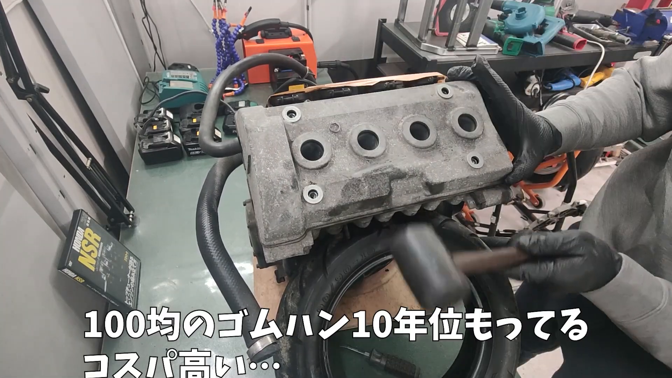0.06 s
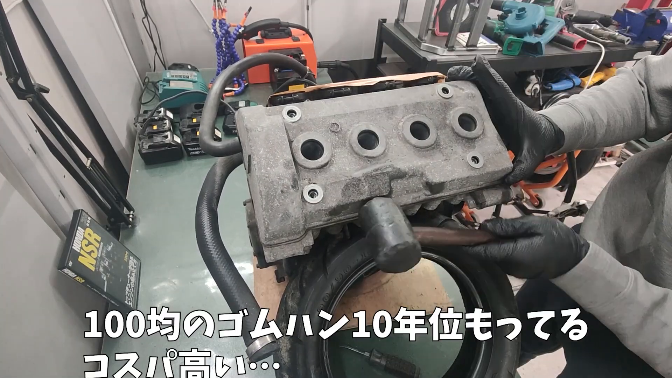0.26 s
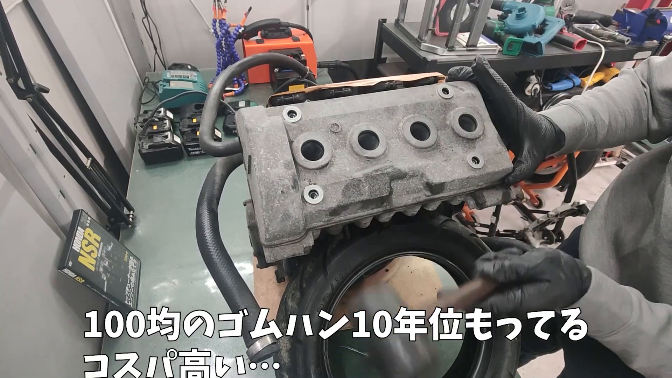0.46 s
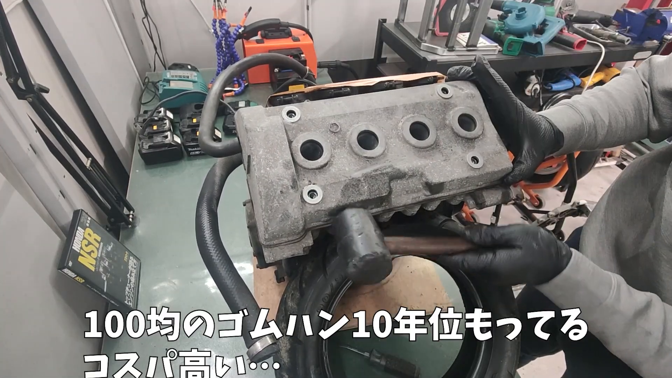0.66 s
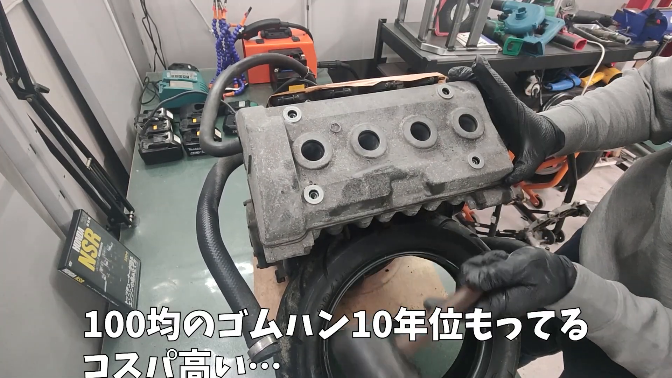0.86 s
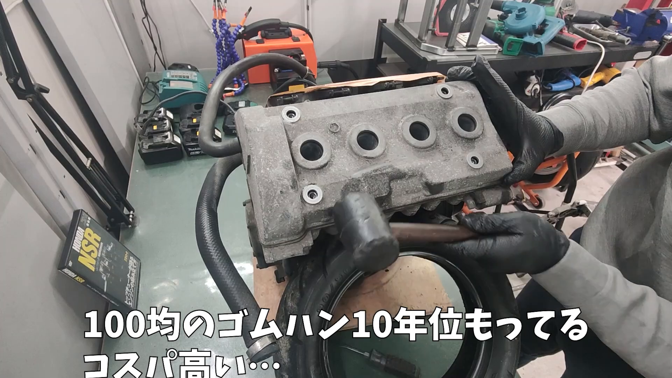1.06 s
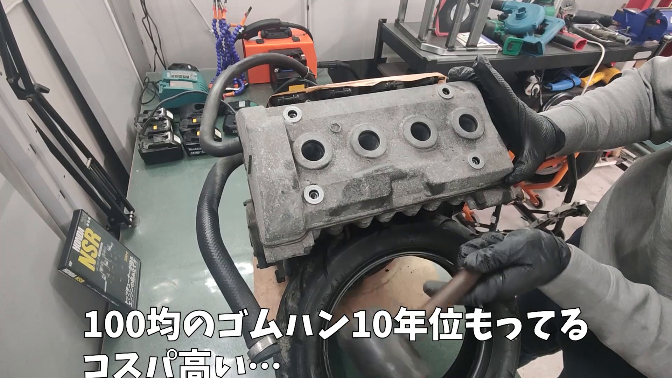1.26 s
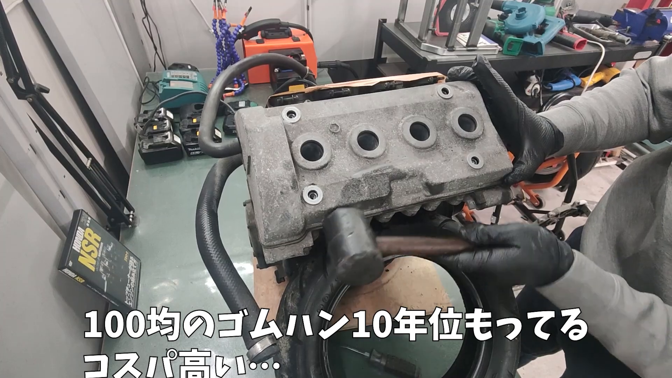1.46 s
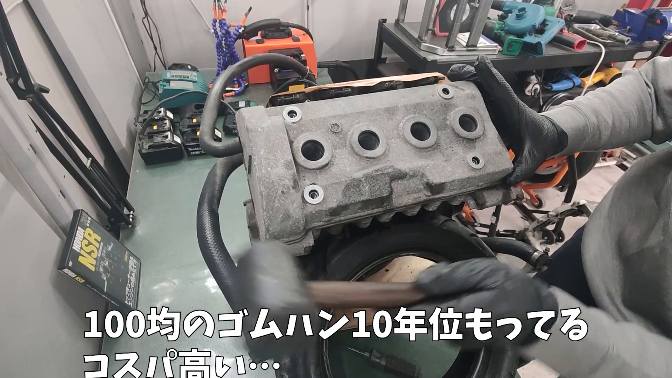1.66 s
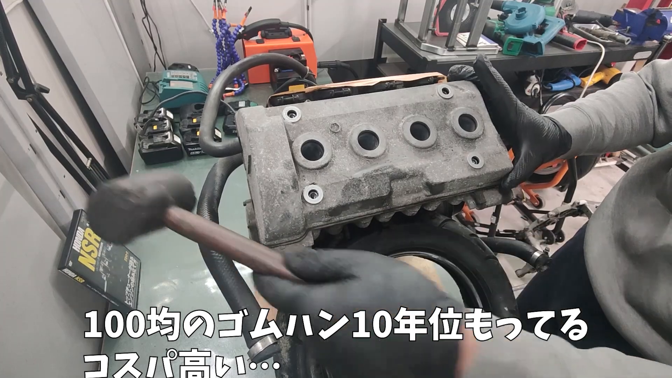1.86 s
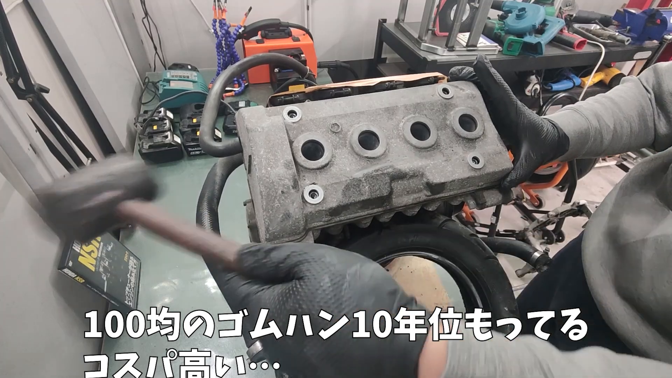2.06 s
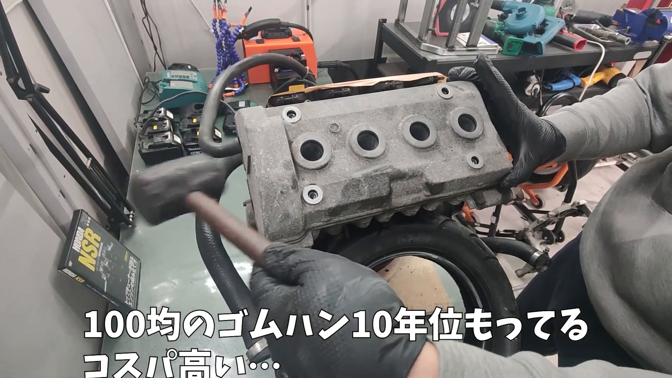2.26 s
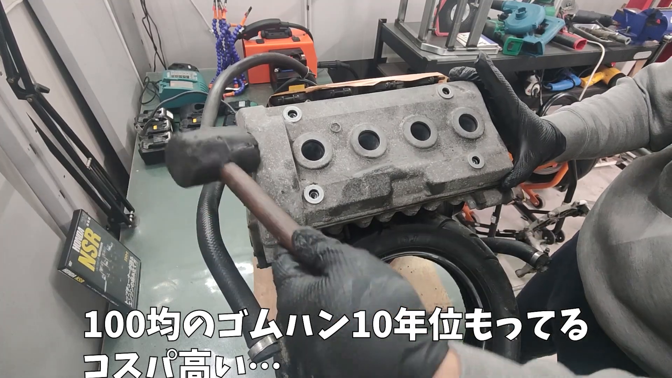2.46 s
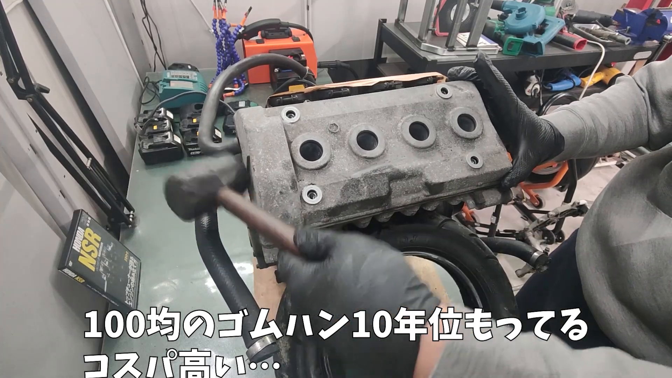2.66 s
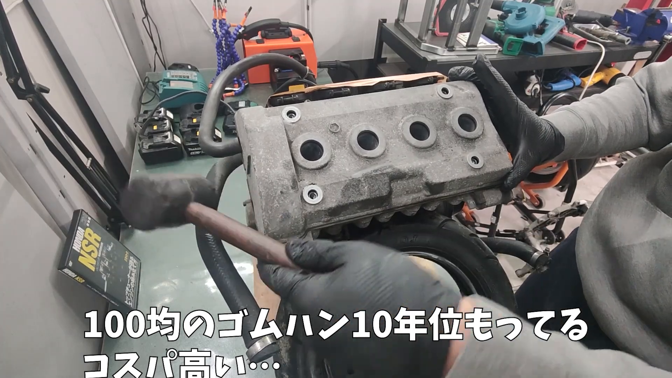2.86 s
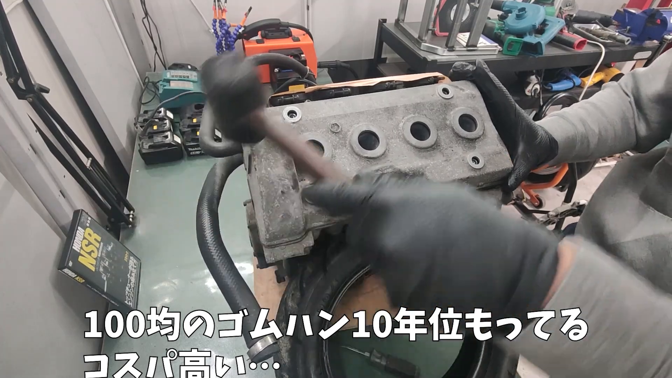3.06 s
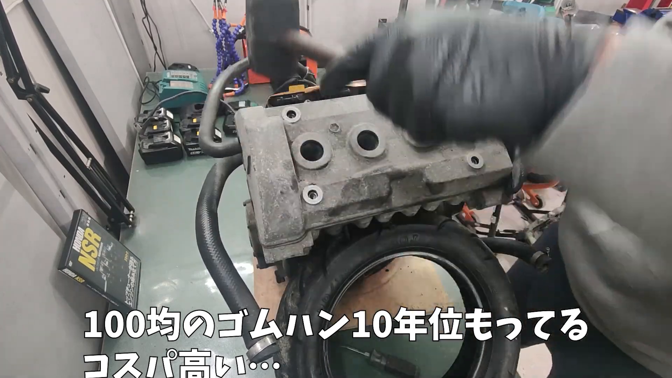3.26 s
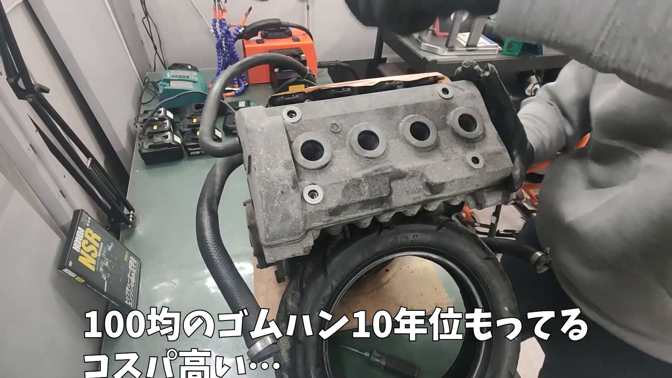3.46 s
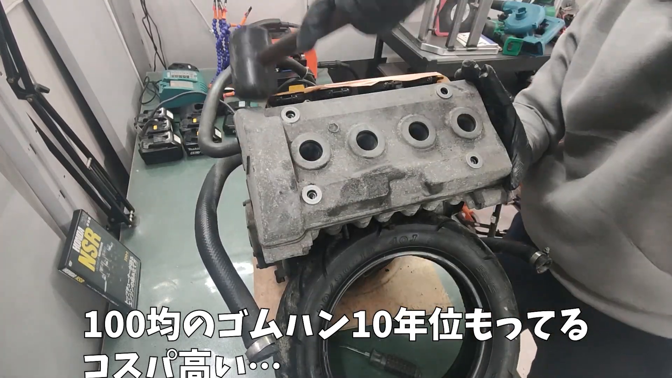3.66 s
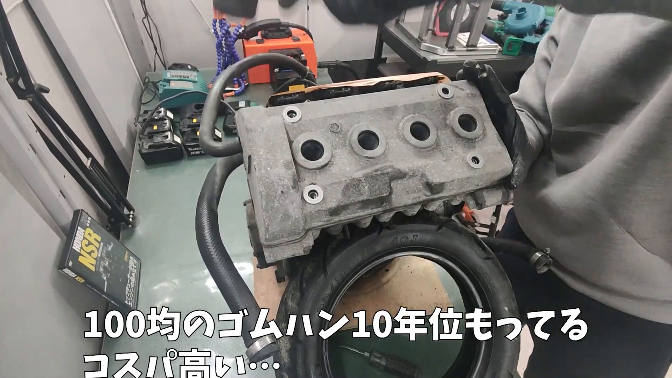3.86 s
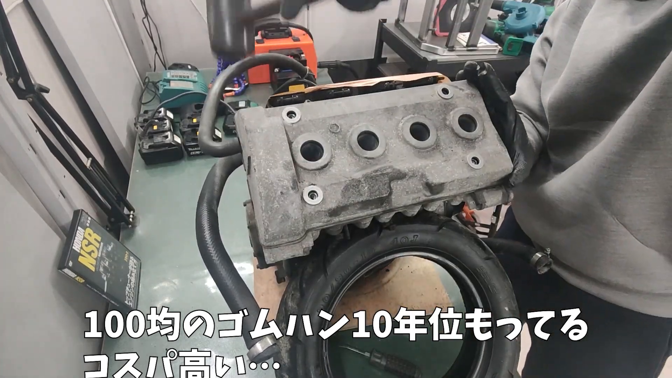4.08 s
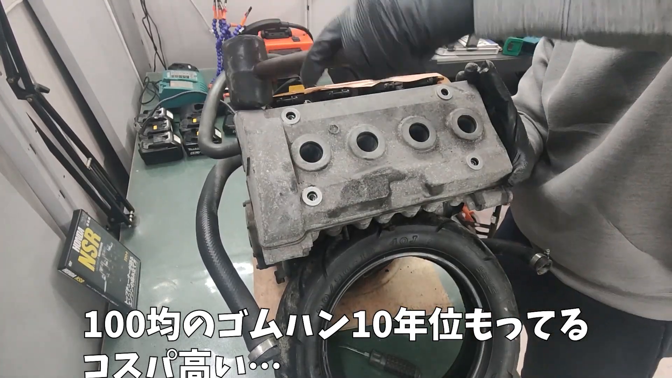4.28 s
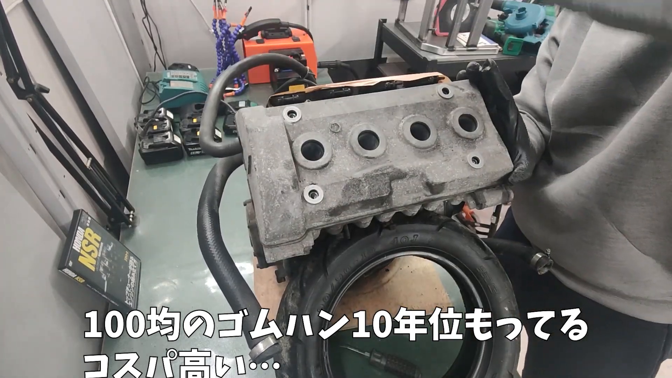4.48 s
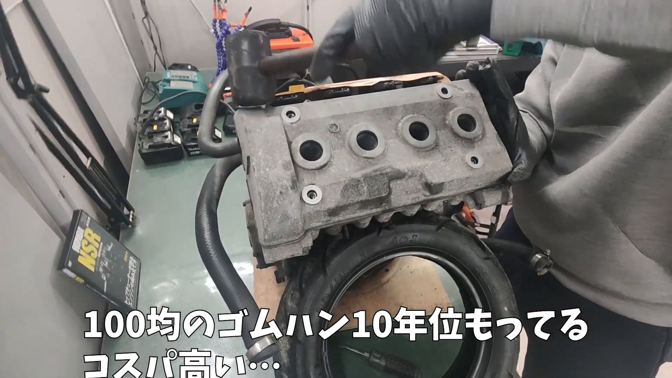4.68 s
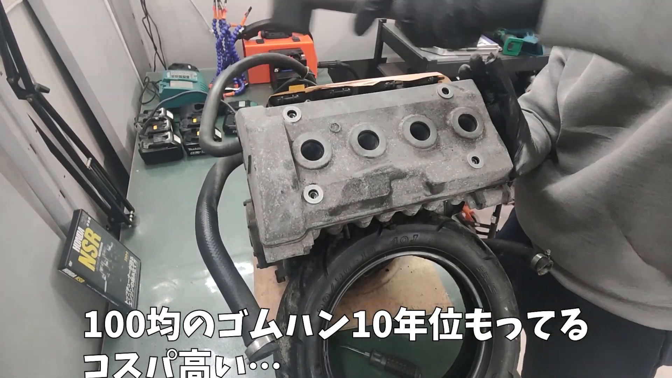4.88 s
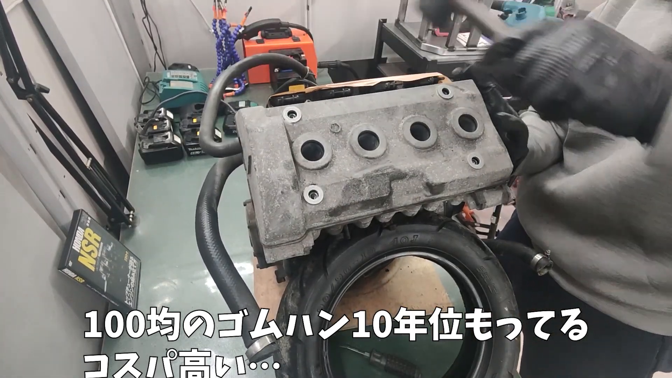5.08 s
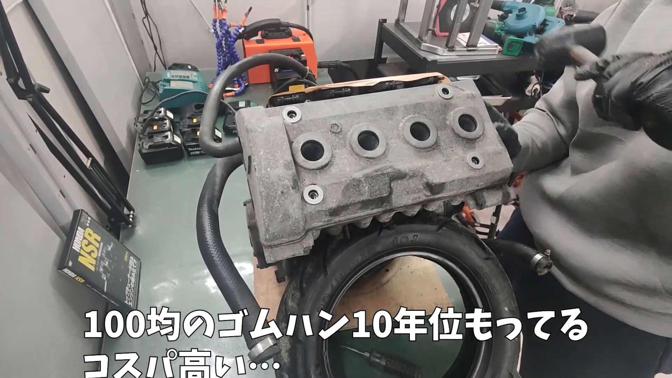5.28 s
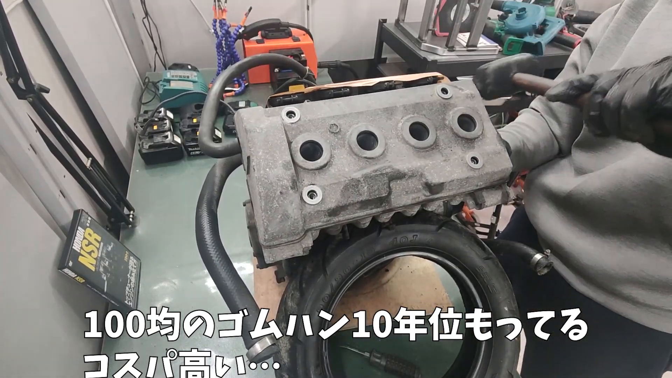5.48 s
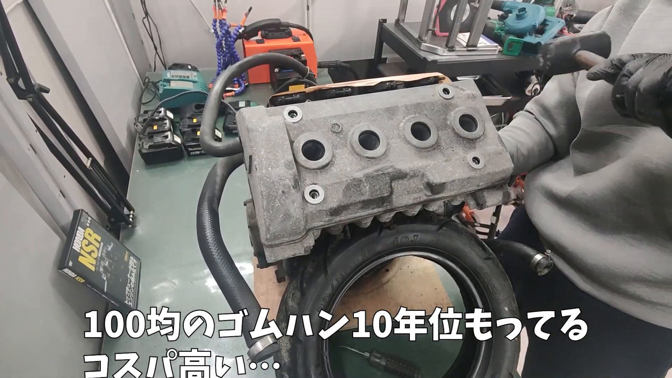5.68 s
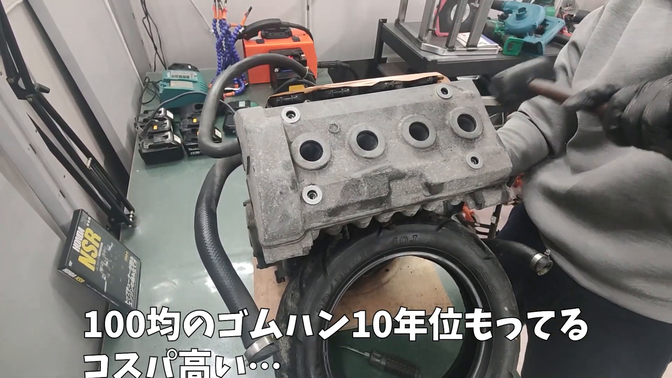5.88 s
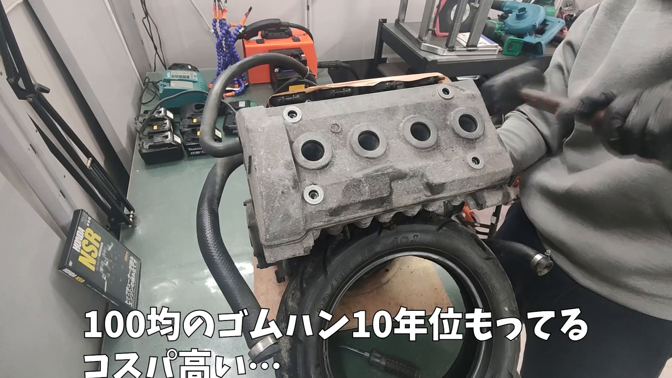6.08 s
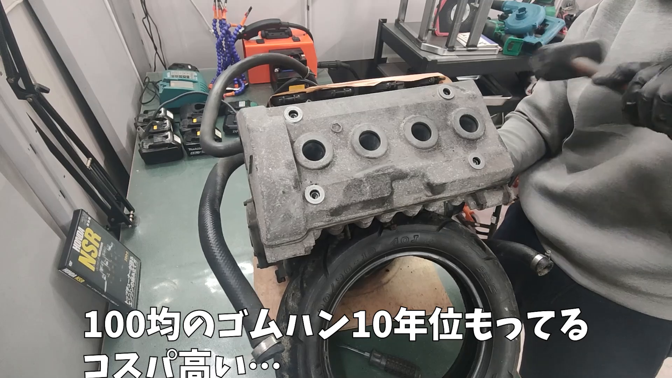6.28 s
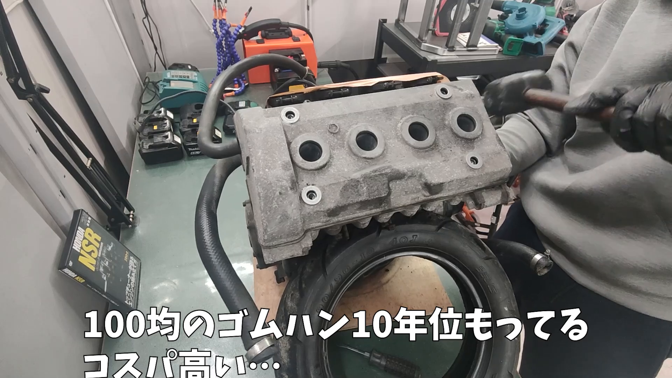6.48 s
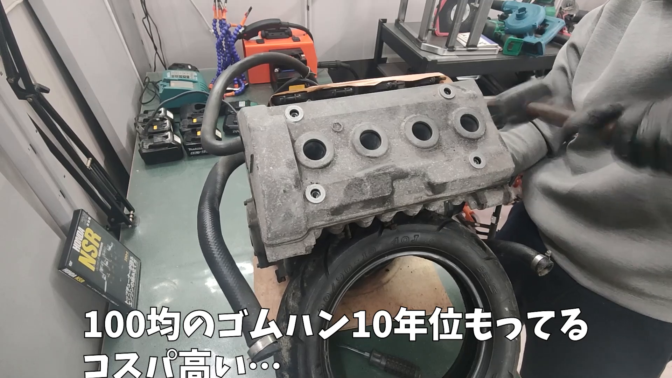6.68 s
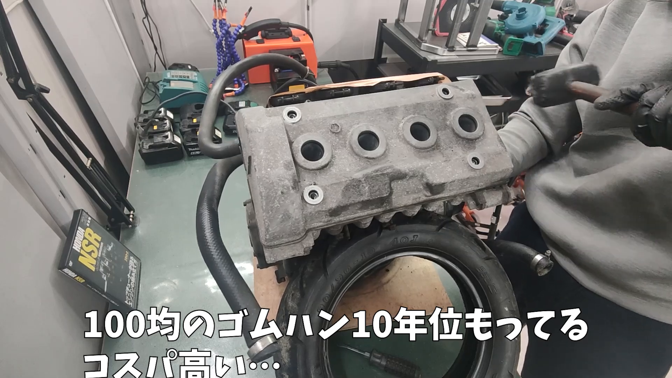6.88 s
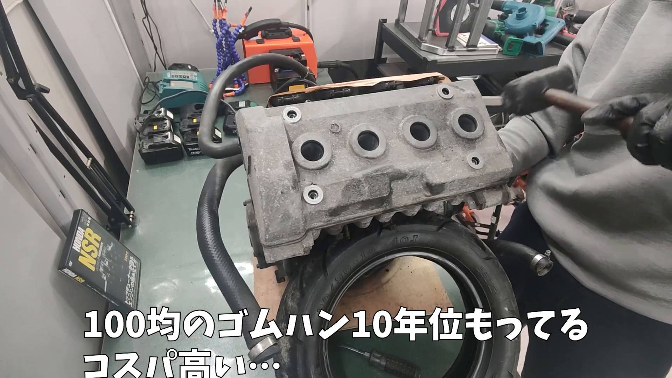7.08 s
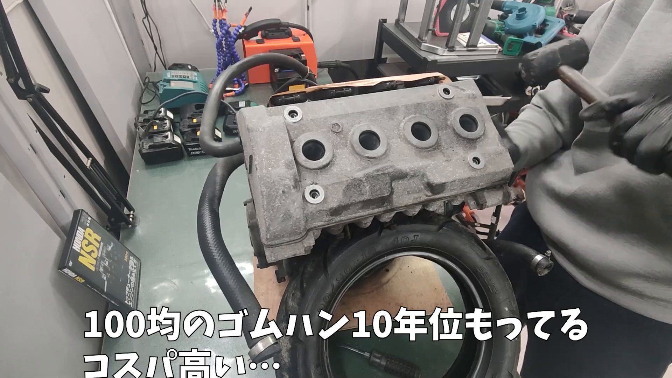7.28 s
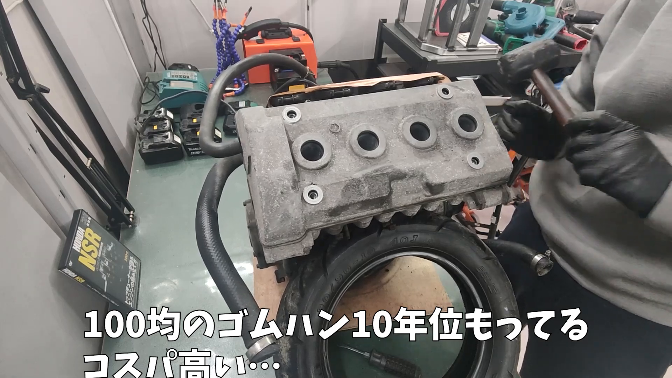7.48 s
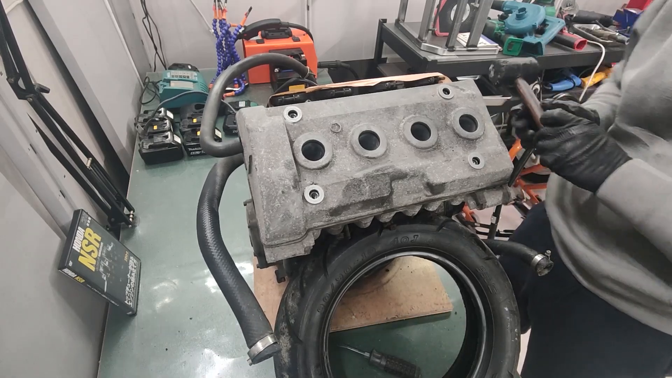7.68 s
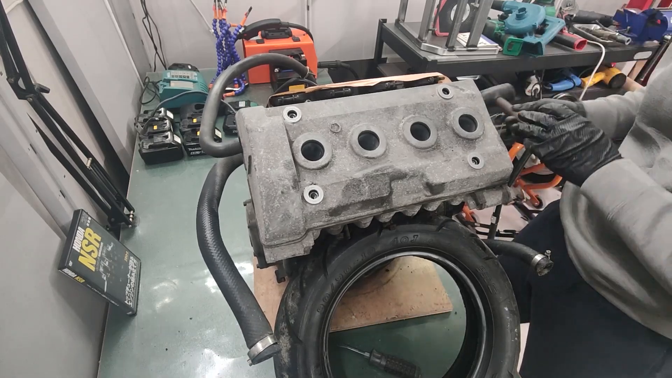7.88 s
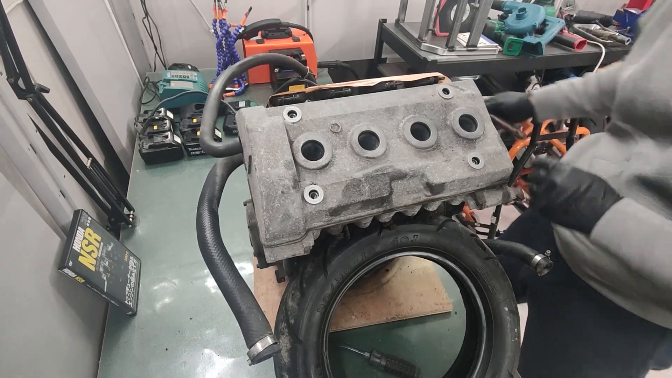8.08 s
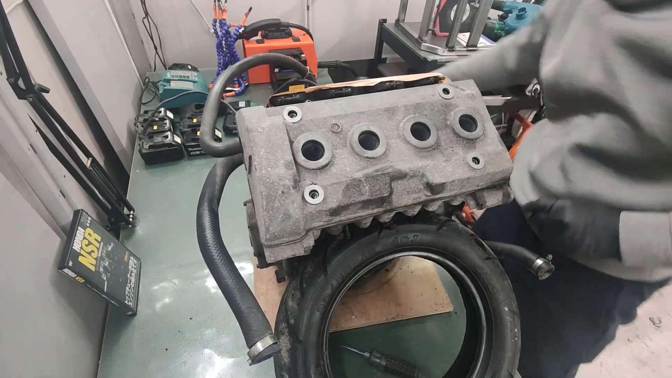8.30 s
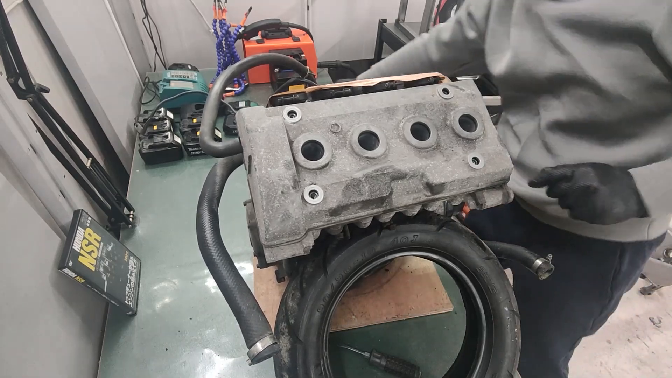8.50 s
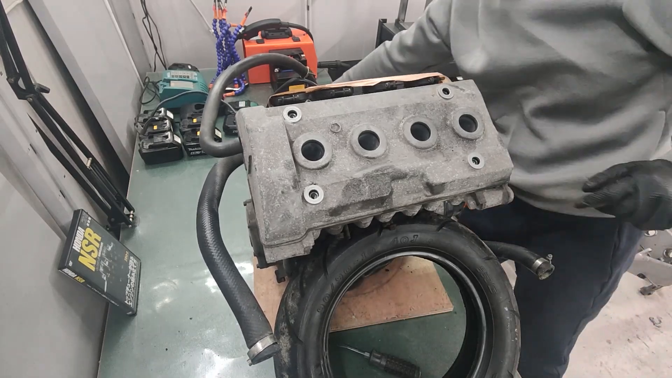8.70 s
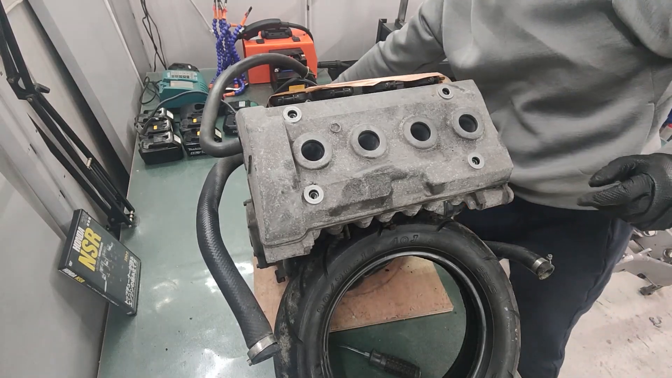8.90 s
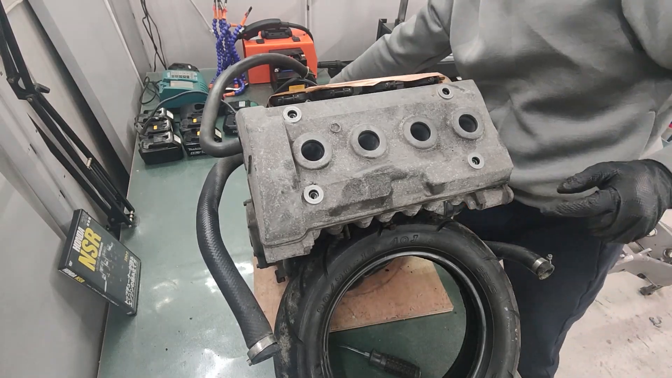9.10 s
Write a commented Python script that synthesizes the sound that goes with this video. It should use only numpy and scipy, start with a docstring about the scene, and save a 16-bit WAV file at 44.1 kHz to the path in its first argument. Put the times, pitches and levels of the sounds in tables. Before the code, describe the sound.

Dull, hollow mallet blows on an aluminium engine cover ring briefly in a small workshop, ending with soft cloth rustle and a late low thud.

```python
"""First heard is a mallet blow already ringing: a rubber mallet taps round a cast aluminium engine cover.
The place is a small hard-walled workshop; each blow is a filtered knock that rings damped modes and the room.
A limiter squashes each blow and lets the room swell up behind it, in uneven runs from edge to edge.
Shaped noise makes sleeves, gloves and body movement; low-passed pulses make dull thuds, the last with a
bright noise at its attack. Shaped noise for still air and a few sines for a low hum lie under it all."""
import sys
import numpy as np
from scipy import signal
from scipy.fft import rfft, irfft
from scipy.io import wavfile
from scipy.ndimage import uniform_filter1d, minimum_filter1d

SR = 44100
rng = np.random.default_rng(int(sys.argv[2]) if len(sys.argv) > 2 else 0)


def waveform_to_disk(signal):
    """Save audio, clipped to [-1, 1], as 16-bit WAV at the path in sys.argv[1]."""
    frames = np.transpose(np.atleast_2d(signal))
    scaled = np.clip(frames, -1, 1) * 32767
    samples = np.round(scaled).astype(np.int16)
    wavfile.write(sys.argv[1], SR, samples)


N = 403293

LEAD = SR // 4  # samples kept ahead of time zero, for a blow that lands before it
TIME = np.arange(N) / SR
RING_TIME = np.arange(SR) / SR

# Mallet blows; a soft, glancing one has a lower contact_hz, the rattle is of the cover on its seat,
# and the struck spot has a hollow note: start_s, edge, relative_force_db, contact_hz, rattle_db, spot_hz
BLOWS = [(-0.05, "left", -2, 348, 0, 740), (0.3298, "near", -2, 804, -13.5, 3670),
         (0.71, "near", 2, 700, -2, 820), (1.0937, "near", 3.5, 667, 5, 1750),
         (1.4672, "near", 4, 684, 8, 860), (2.224, "left", -6.5, 710, -3, 475),
         (2.5012, "left", -7.5, 606, 0.5, 500), (2.7589, "left", -3.5, 330, 4, 124),
         (3.6583, "far", -2, 730, -12, 775), (4.009, "far", 0.5, 730, -0.5, 820),
         (4.044, "far", -9, 520, 3, 830), (4.3527, "far", 1, 785, 4.5, 2020),
         (4.6961, "far", 4.5, 646, 14.5, 2200), (5.5035, "corner", -8.5, 324, 2.5, 1600),
         (5.8572, "corner", -6, 690, 3.5, 574), (6.1897, "right", -6, 700, -2, 406),
         (6.4878, "right", -3, 654, 1, 4850), (6.791, "right", -4.5, 860, -3.5, 1430),
         (7.122, "right", -8.5, 606, -3.5, 640)]
# Knock of rubber on the casting, spectrum shape: pitch_hz, relative_level_db
KNOCK_SPECTRUM = [(45, -43), (100, -16.5), (200, -7.5), (350, -3), (550, 2), (900, -1), (1300, 0.5),
                  (1750, -5), (2400, -9.5), (4000, -17), (6500, -25), (9000, -38), (11500, -37.5),
                  (15000, -48)]
# Modes of the cover, damped by its gasket, before each blow's variation: pitch_hz, level_over_knock_db, t60_s
COVER_MODES = [(214, -6, 0.19), (383.5, -1.5, 0.066), (528, -3, 0.029), (683, 1, 0.014), (913, -2, 0.084),
               (1155, 0.5, 0.071), (1220, -11.5, 0.089), (1578, -4.5, 0.09), (1800, -7, 0.011),
               (2200, -9, 0.024)]
# Modes of a steel fitting, before nearness to it is counted: pitch_hz, relative_level_db, t60_s
STEEL_MODES = [(3307, 7, .25), (3682, 8, .25), (4795, 2, .15), (6575, 10, .15), (7385, 17, .22),
               (7425, 15, .14), (12950, 13, .13)]
# How each edge colours the knock, by edge name: pitch_hz, level_db
EDGE_COLOURS = {"near": [(110, -2.5), (270, -9), (530, -9), (1150, -0.5), (1750, -3.5), (2300, -9.5),
                (4300, -9), (14000, -2.5)], "left": [(110, 0), (270, -7), (500, -2.5), (750, 0),
                (1150, -0.5), (2150, -4.5), (4300, -6), (14000, 4)], "far": [(110, -2.5), (270, -10),
                (530, -8.5), (1150, 0), (2150, -4), (4300, -9.5), (14000, 6)], "corner": [(110, -2),
                (270, -5), (530, -5.5), (1150, 3), (2150, -7.5), (3300, -0.5), (5000, -5.5), (14000, 11.5)],
                "right": [(110, -3), (270, 5.5), (530, -2.5), (1150, 0), (2150, -0.5), (4300, 6),
                (14000, 20.5)]}
# Where the mallet works across the stereo image: time_s, left_minus_right_db
PLACES = [(.5, 0), (2.5, 1.5), (4.7, -1.5), (6.1, -2.5), (7.1, -0.8)]
# Reverberation: pitch_hz, level_against_direct_db, t60_s
ROOM_TAIL = [(61.5, 20.5, 0.48), (182, 3, 0.38), (300, 0.5, 0.46), (544, -4, 0.56), (1220, -4, 0.58),
             (4000, -1, 0.63), (8000, -4, 0.49), (13900, -4, 0.21)]
# Standing waves between the walls: pitch_hz, level_over_direct_db, t60_s
STANDING_WAVES = [(72.7, 30.5, 0.59), (128.9, 22.5, 0.72)]
# First reflections, off the floor and the wall: delay_s, left_db, right_db
FIRST_BOUNCES = [(.0071, -5.5, -18.5), (.0096, -8.5, -11)]
# Dull thuds close by: start_s, level_db, contact_hz
THUD_TIMES = [(6.857, -27.5, 300), (8.8086, -26, 150), (8.8237, -14.5, 453)]
# Dull body of the thuds, spectrum shape: pitch_hz, relative_level_db
THUD_SPECTRUM = [(25, -46), (50, -18.5), (90, -36), (190, 0.5), (350, 4), (600, -2), (1000, -10.5),
                 (1700, -29), (5000, -27), (15000, -37)]
# Sleeve strokes, and last the bright noise at the attack of the late thud:
# middle_s, half_length_s, level_db, centre_hz
SOFT_STROKES = [(3.359, 0.034, -61.5, 3400), (7.784, 0.035, -62.5, 5170), (7.895, 0.036, -57.5, 6240),
                (8.011, 0.045, -60, 2980), (8.324, 0.072, -57.5, 2290), (8.6, 0.87, -70, 8000),
                (8.864, 0.04, -57, 4800)]
# Gloves scuff the handle and the cover: start_s, level_db, centre_hz, fade_s
GLOVE_SCUFFS = [(3.3, -58.5, 1650, 0.081), (3.49, -68, 2690, 0.29), (5.18, -52, 1020, 0.022),
                (5.293, -53.5, 1300, 0.013), (7.499, -62.5, 4000, 0.054), (7.677, -64.5, 1150, .05),
                (7.98, -57, 1170, 0.083), (8.255, -53, 1250, .12), (8.483, -49.5, 1620, 0.073)]
# Tones of one glove that squeaks as it slides: pitch_hz, level_db
SQUEAK_TONES = [(1850, -61), (2640, -57)]
# The worker leans over, straightens up and steps back: start_s, end_s, rumble_db, cloth_db
BODY_MOVES = [(3.152, 3.6, -72.5, -87), (3.66, 5.954, -57.5, -57.5), (5.95, 7.423, -62, -71),
              (7.7, 9.3, -55, -66), (8.165, 8.596, -75, -66), (8.67, 8.773, -52.5, -90)]
# Still air, spectrum shape: pitch_hz, relative_level_db (per Hz)
AIR_SPECTRUM = [(20, -22), (40, -1), (65, -1), (110, -5.5), (250, -10), (600, -16), (1300, -21),
                (2500, -34), (7000, -45.5), (11000, -43), (15000, -50.5)]
# Low hum: pitch_hz, level_db (rms)
HUM_TONES = [(64.6, -77), (129, -74.5), (312, -76), (371, -87)]
# Colour of the microphone port: pitch_hz, level_db
PORT_COLOUR = [(8500, -0.5), (11500, -8), (13500, -2), (15300, 1.5), (17000, 9.5)]

CONTACT_HZ = 700  # a square blow, which gives the plain knock
RATTLE_HZ = 5500  # half the rattle is reached here, more above
SPOT_DB, SPOT_OCTAVES = 3.5, 0.16  # height and half width of the spot's note
# the mallet passes the steel fitting: when, how loudly it rings there, how fast that falls before and after
FITTING_S, FITTING_DB, FITTING_FALL_DB_PER_S = 6.79, 0.5, 27.5
SCUFF_SPREAD, SQUEAK_SPREAD = 1.63, 1.04  # band edge over centre
SQUEAK_S, SQUEAK_FADE_S = 8.262, 0.079
MOVE_RAMP_S = 0.029  # each movement starts and stops this gently
AIR_DB = -62.5  # rms
TOP_HZ = 16000  # upper limit of the recorded band


def mallet(blow_db=3):
    """Each blow pushes the cover and rings its modes; each edge reaches the room by its own paths."""
    out = np.zeros((2, LEAD + N))
    rooms = {edge: workshop() for edge in EDGE_COLOURS}
    knock = pulse(KNOCK_SPECTRUM)
    knock = knock / np.abs(knock).max()
    steel = ring(STEEL_MODES)
    for s, edge, force_db, contact_hz, rattle_db, spot_hz in BLOWS:
        colour = pulse(blow_colour(edge, contact_hz, rattle_db, spot_hz))
        push = signal.fftconvolve(knock, colour)[:len(knock)]
        # every blow lands a little differently: modes shift in pitch (ratio) and level (dB)
        chance = rng.standard_normal((len(COVER_MODES), 2))
        pitch_ratio = 1 + chance[:, :1] * [.012, 0, 0]
        level_shift = chance[:, 1:] * [0, 2.5, 0]
        cover = ring(np.array(COVER_MODES) * pitch_ratio + level_shift)
        steel_db = FITTING_DB - FITTING_FALL_DB_PER_S * abs(s - FITTING_S)
        metal = signal.unit_impulse(SR) + cover + undb(steel_db) * steel
        blow = spread_out(signal.fftconvolve(push, metal)[:SR // 2])
        side_db = np.interp(s, *np.transpose(PLACES)) * np.array([[.5], [-.5]])
        in_room = signal.fftconvolve(blow[None], rooms[edge], axes=1)
        add(out, undb(force_db + blow_db + side_db) * in_room, s)
    return out[:, LEAD:]


def blow_colour(edge, contact_hz, rattle_db, spot_hz):
    """A longer contact rolls the knock off sooner, a jumping cover adds treble, the spot adds its note."""
    hz = np.geomspace(50, 16000, num=80)
    edge_hz, edge_db = np.transpose(EDGE_COLOURS[edge])
    edge_colour = np.interp(np.log(hz), np.log(edge_hz), edge_db)
    contact = 20 * np.log10((1 + (hz / CONTACT_HZ) ** 2) / (1 + (hz / contact_hz) ** 2))
    rattle = rattle_db * hz ** 2 / (hz ** 2 + RATTLE_HZ ** 2)
    spot = SPOT_DB * np.exp(-.5 * (np.log2(hz / spot_hz) / SPOT_OCTAVES) ** 2)
    return np.column_stack([hz, edge_colour + contact + rattle + spot])


def spread_out(x, bend_hz=900, width_hz=420, count=16):
    """All-passes smear a blow in time without colouring it: the body lags, the treble chatters at random."""
    chance = rng.random((count, 2))
    chatter_hz = 2300 + 13500 * chance[:, 0] ** 2
    chatter_width = width_hz * (.3 + 1.5 * chance[:, 1])
    for hz, width in [(bend_hz, bend_hz), *zip(chatter_hz, chatter_width)]:
        _, poles = signal.iirpeak(hz, hz / width, fs=SR)
        x = signal.lfilter(poles[::-1], poles, x)
    return x


def workshop(near_db=-4, near_s=0.0063, build_s=0.001):
    """Direct sound, scatter off the engine and bench, then the tail of the room and its standing waves."""
    noise, tail = rfft(diffuse(SR)), 0
    hz = np.maximum(np.fft.rfftfreq(SR, 1 / SR), 1)
    half_octave = np.round(2 * np.log2(np.maximum(hz, ROOM_TAIL[0][0])))
    gain, t60 = undb(along(ROOM_TAIL, SR)), along(ROOM_TAIL, SR, column=2)
    # each half octave decays at its own rate
    for k in np.unique(half_octave):
        inside = half_octave == k
        damping = np.log(1000) / t60[inside].mean()
        tail = tail + irfft(noise * gain * inside) * np.exp(-damping * RING_TIME) * np.sqrt(2 * damping / SR)
    response = tail * (1 - np.exp(-RING_TIME / build_s)) + ring(STANDING_WAVES)
    scatter = diffuse(SR, apart_hz=500) * np.exp(-RING_TIME / near_s) * np.sqrt(2 / near_s / SR)
    response += undb(near_db) * scatter
    response[:, 0] += 1  # direct sound
    for s, left_db, right_db in FIRST_BOUNCES:
        response[:, int(s * SR)] += undb([left_db, right_db])
    return response


def thuds(room, dry_db=-4, dry_s=0.36):
    """Soft, heavy contacts close by: a softer contact rolls off lower, and the late room is weaker."""
    out, body = np.zeros((2, LEAD + N)), pulse(THUD_SPECTRUM)
    close = room * (undb(dry_db) + (1 - undb(dry_db)) * np.exp(-RING_TIME / dry_s))
    for s, db, hz in THUD_TIMES:
        push = signal.sosfilt(signal.butter(1, hz, fs=SR, output="sos"), body)
        push = push / np.abs(push).max()
        add(out, undb(db) * signal.fftconvolve(push[None], close, axes=1), s)
    return out[:, LEAD:]


def handling(grain_db=1.0, rise_s=0.0072):
    """Grainy noise bands: sleeves, the late thud's bright attack, glove scuffs and squeak, body rumble."""
    grain = unit(uniform_filter1d(rng.standard_normal(N), size=300))
    fibres = diffuse(N) * undb(grain_db * grain)
    out = 0
    for s, half, db, hz in SOFT_STROKES:
        swell = np.exp(-.5 * ((TIME - s) / half) ** 2)
        out = out + undb(db) * unit(band(fibres, hz, 2.9)) * swell
    for s, db, hz, fade in GLOVE_SCUFFS:
        out = out + undb(db) * unit(band(fibres, hz, SCUFF_SPREAD)) * burst(s, rise_s, fade)
    for hz, db in SQUEAK_TONES:
        out = out + undb(db) * unit(band(fibres, hz, SQUEAK_SPREAD)) * burst(SQUEAK_S, rise_s, SQUEAK_FADE_S)
    rumble = unit(band(diffuse(N), 49.3, 2.53))
    cloth = unit(band(fibres, 440, 2.07))
    for start, end, rumble_db, cloth_db in BODY_MOVES:
        moving = .5 * (np.tanh((TIME - start) / MOVE_RAMP_S) - np.tanh((TIME - end) / MOVE_RAMP_S))
        out = out + moving * (undb(rumble_db) * rumble + undb(cloth_db) * cloth)
    return out


def background():
    """Still room air as shaped noise, and a faint low hum of steady sines."""
    air = unit(irfft(rfft(diffuse(N)) * undb(along(AIR_SPECTRUM, N)), N))
    hum = 0
    for hz, db in HUM_TONES:
        hum = hum + undb(db) * np.sqrt(2) * np.sin(2 * np.pi * (hz * TIME + rng.random()))
    return undb(AIR_DB) * air + hum


def undb(db):
    """Decibels to gain."""
    return 10 ** (np.asarray(db) / 20)


def unit(x):
    """Scale to rms 1."""
    return x / np.sqrt(np.mean(x ** 2))


def along(points, size, column=1):
    """A table column on the log-frequency axis of a transform."""
    table = np.array(points, float)
    hz = np.maximum(np.fft.rfftfreq(size, 1 / SR), 1)
    return np.interp(np.log(hz), np.log(table[:, 0]), table[:, column])


def pulse(points, size=4096):
    """The shortest causal (minimum-phase) pulse with a given spectrum: pitch_hz, level_db."""
    cepstrum = irfft(np.log(undb(along(points, size))))
    cepstrum[1:size // 2] *= 2
    cepstrum[size // 2 + 1:] = 0
    return irfft(np.exp(rfft(cepstrum)))


def ring(modes):
    """Damped modes, each with its given gain at resonance."""
    out = 0
    for hz, db, t60 in modes:
        damping = np.log(1000) / t60
        decay = 2 * damping / SR * np.exp(-damping * RING_TIME)
        out = out + undb(db) * decay * np.cos(2 * np.pi * hz * RING_TIME)
    return out


def diffuse(size, apart_hz=1100):
    """White noise from all sides: alike at both microphones in the bass, unrelated in the treble."""
    mid, side = rfft(rng.standard_normal((2, size)))
    hz = np.fft.rfftfreq(size, 1 / SR)
    width = hz / np.hypot(hz, apart_hz)
    return irfft((mid + np.array([[1], [-1]]) * width * side) / np.hypot(1, width), size)


def band(x, hz, spread):
    """A gentle band-pass from hz / spread to hz * spread, kept below the top of the range."""
    spread = max(spread, 1.02)
    edges = [hz / spread, min(hz * spread, .45 * SR)]
    return signal.sosfilt(signal.butter(2, edges, "band", fs=SR, output="sos"), x)


def burst(s, rise_s, fade_s):
    """An envelope that rises quickly at s and dies away."""
    age = np.maximum(TIME - s, 0)
    return (1 - np.exp(-age / rise_s)) * np.exp(-age / fade_s)


def add(track, sound, s):
    """Mix a sound into a track that begins a little before time zero."""
    start = LEAD + int(s * SR)
    part = sound[:, :track.shape[1] - start]
    track[:, start:start + part.shape[1]] += part


def scene():
    """Blows and thuds ring the workshop, over handling noise, still air and hum."""
    return mallet() + thuds(workshop()) + handling() + background()


def record(dry, release_s=0.055):
    """The port colours the treble; a look-ahead limiter drops at peaks and recovers steadily; the top is cut."""
    heard = signal.fftconvolve(dry, pulse(PORT_COLOUR)[None], axes=1)[:, :N]
    ceiling = undb(-10.2)
    over = np.log(np.maximum(np.abs(heard).max(axis=0) / ceiling, 1))
    # after a peak the cut shrinks by one neper (8.7 dB) per release_s
    held = np.maximum.accumulate(over + TIME / release_s) - TIME / release_s
    gain = uniform_filter1d(minimum_filter1d(np.exp(-held), size=89), size=89)  # about 1 ms to each side
    return signal.sosfilt(signal.ellip(8, .2, 70, TOP_HZ, fs=SR, output="sos"), heard * gain)


dry = scene()
out = record(dry)
waveform_to_disk(out)
```